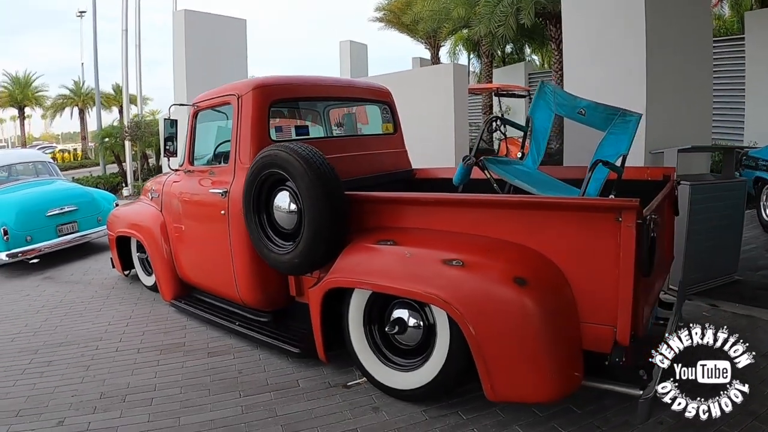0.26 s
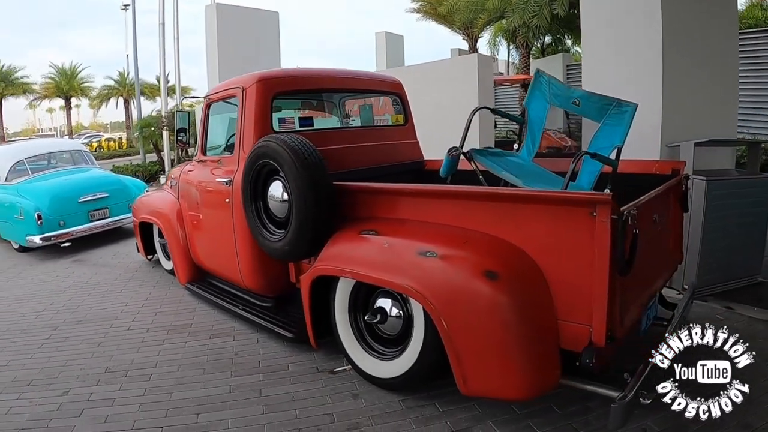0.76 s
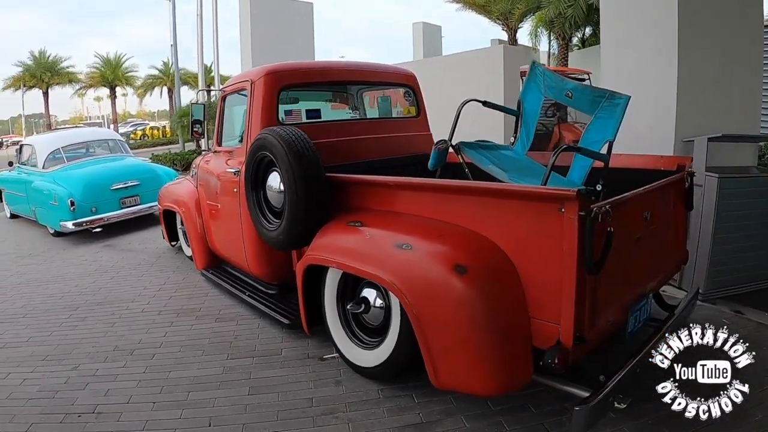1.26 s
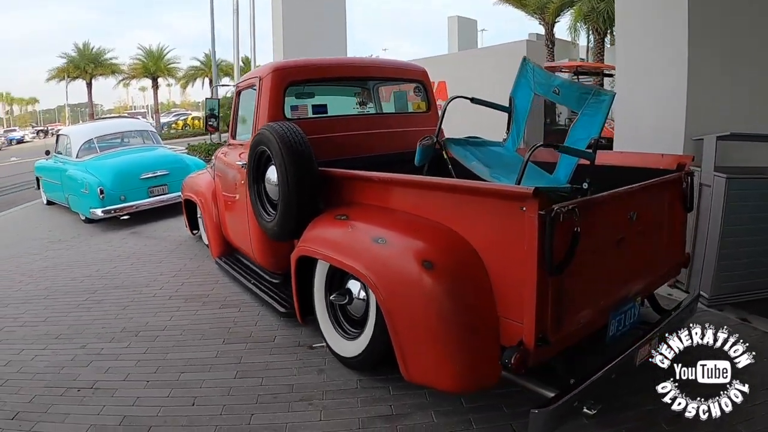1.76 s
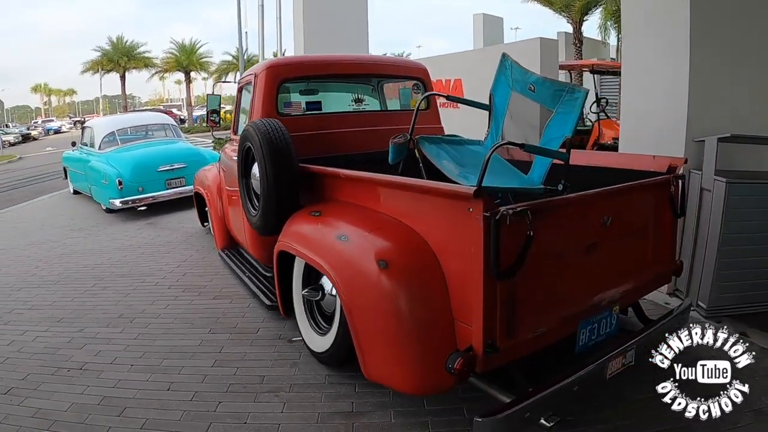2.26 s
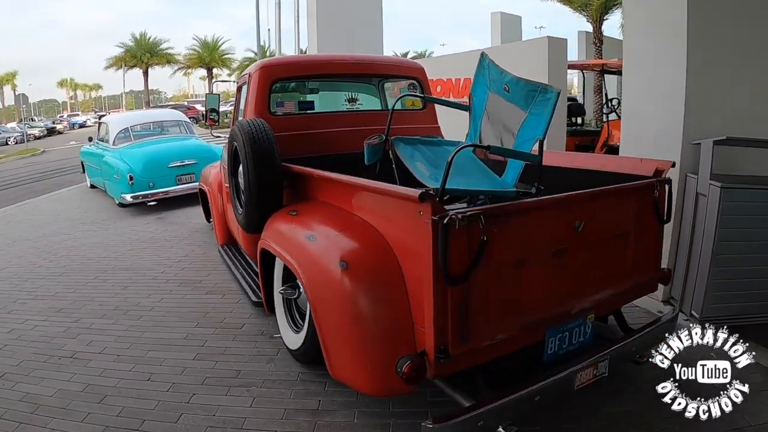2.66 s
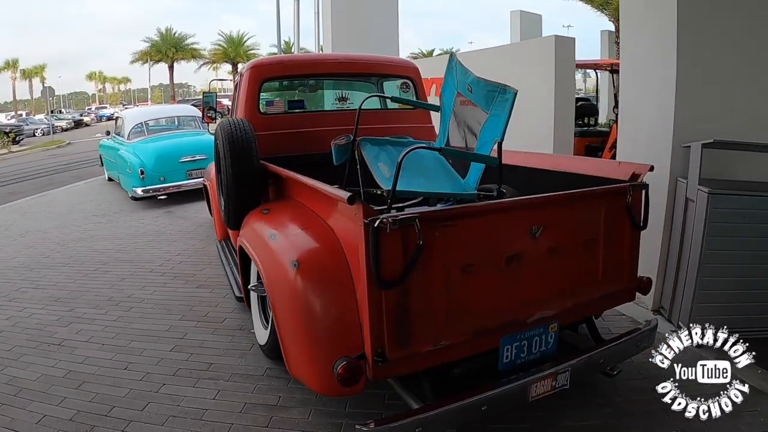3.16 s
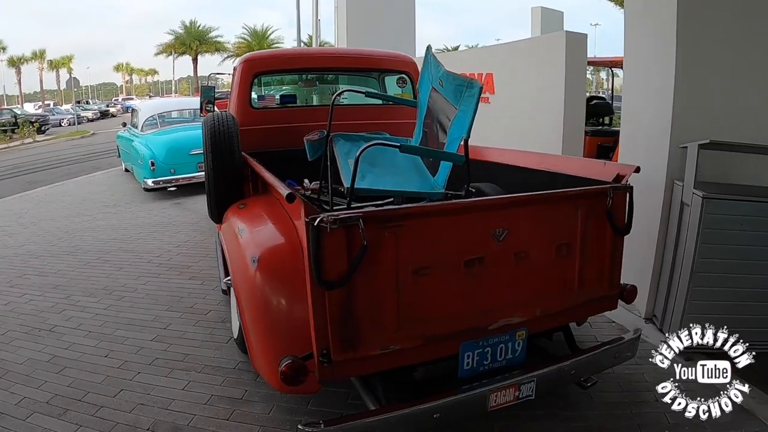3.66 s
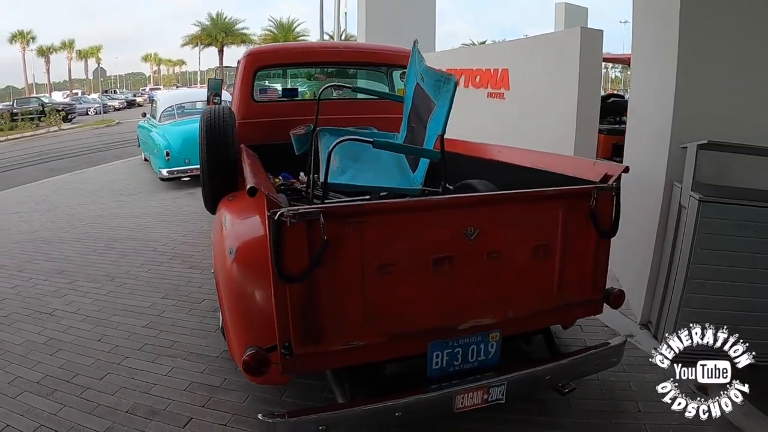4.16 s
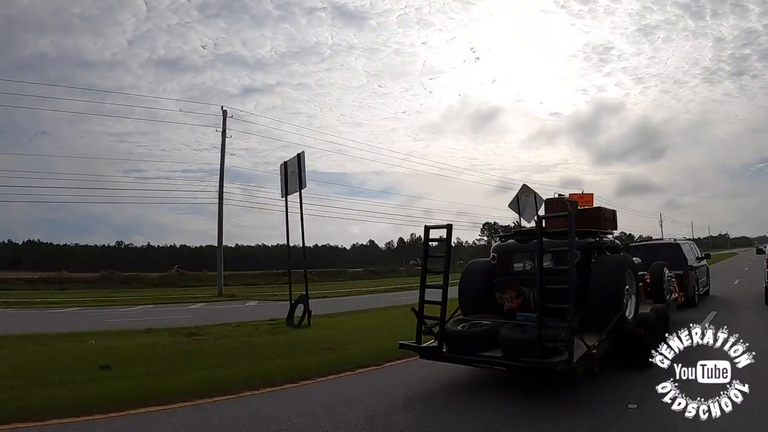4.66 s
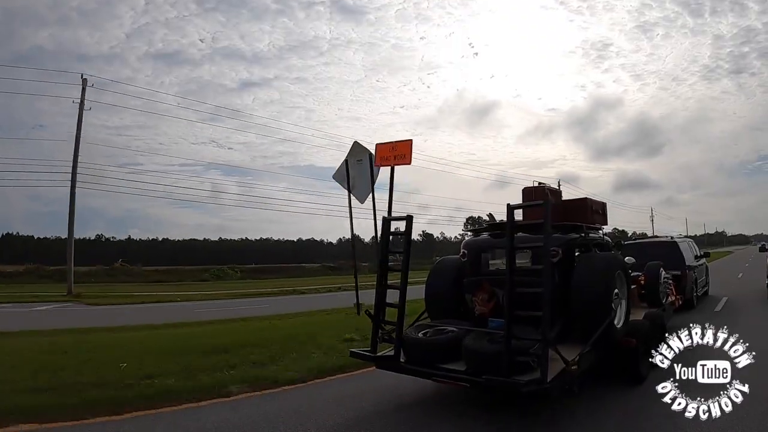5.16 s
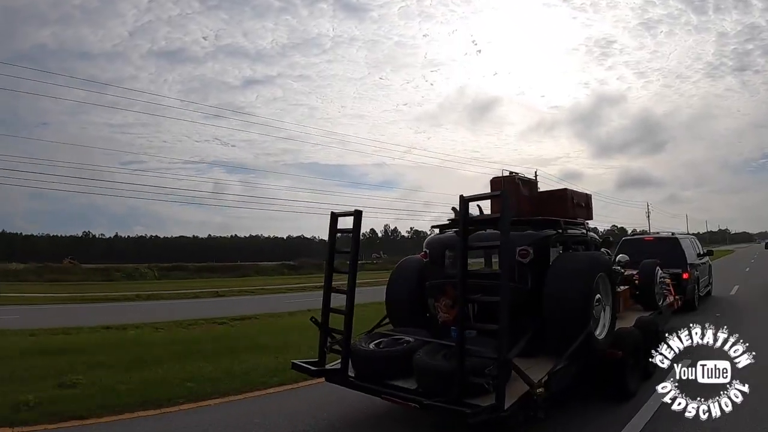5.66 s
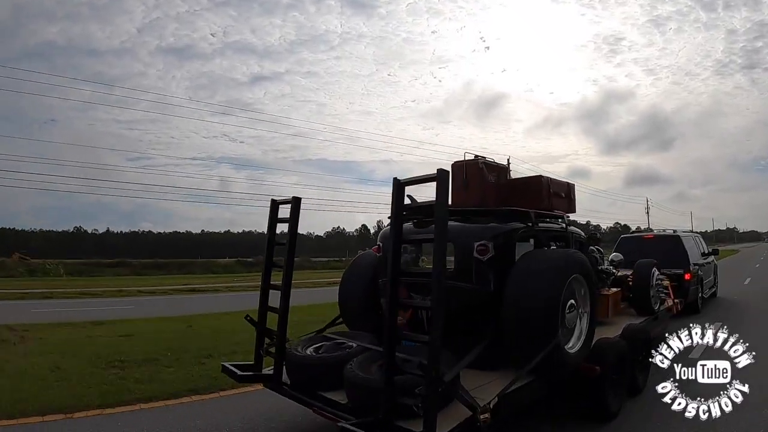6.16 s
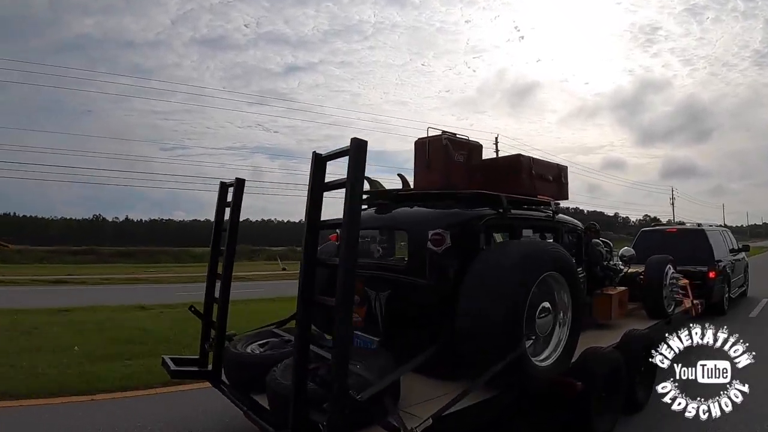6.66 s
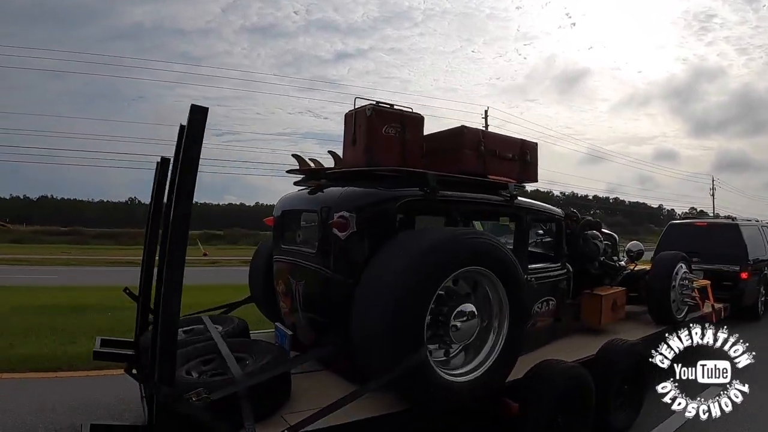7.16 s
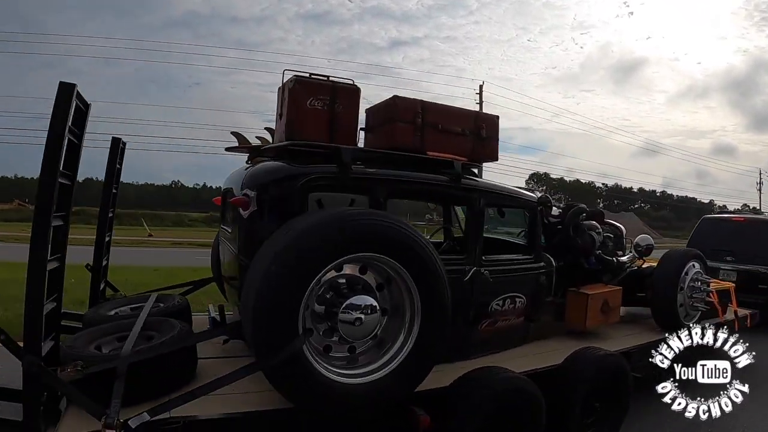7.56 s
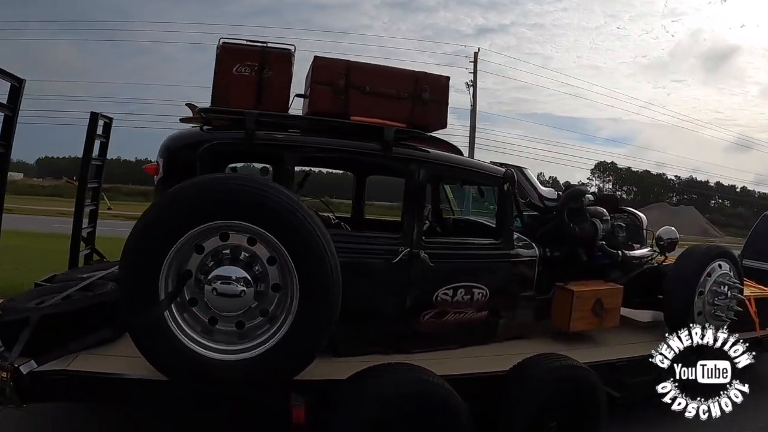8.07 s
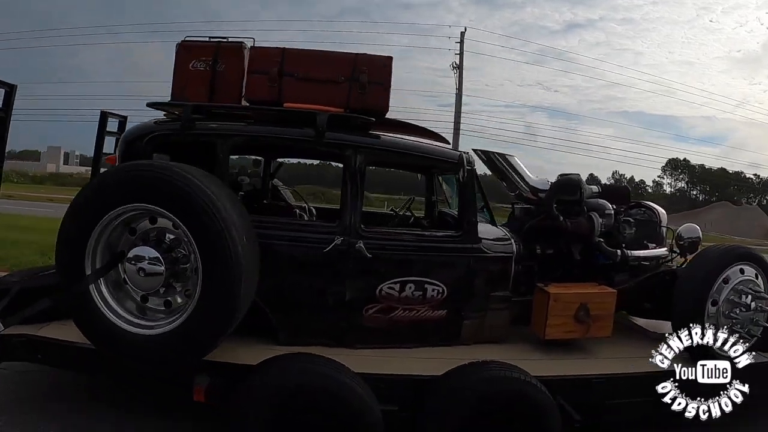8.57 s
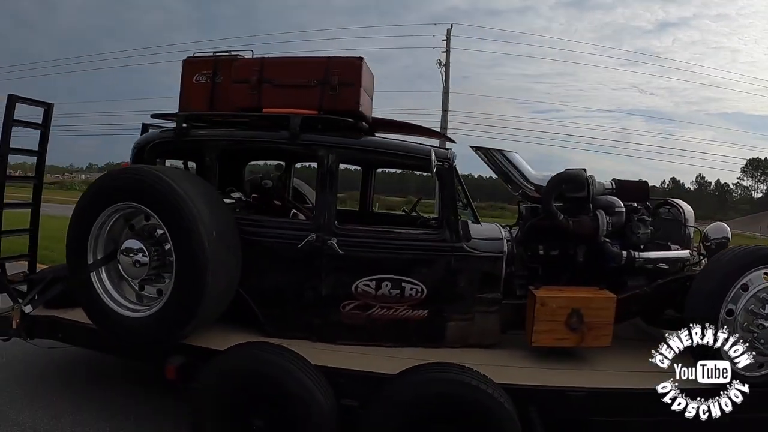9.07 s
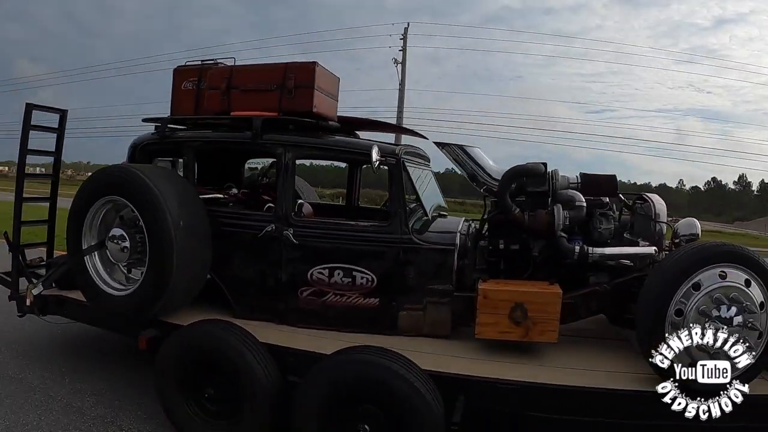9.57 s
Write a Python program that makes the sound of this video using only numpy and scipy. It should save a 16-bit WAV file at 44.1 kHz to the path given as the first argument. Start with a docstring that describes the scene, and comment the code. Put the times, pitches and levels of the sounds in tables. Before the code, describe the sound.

A dull, bumping scrape sounds over the low pulsing exhaust of an idling truck in an echoing covered area. Faint metal clinks follow, then a door thuds shut with a latch rattle. The sound cuts off and a much louder highway ride begins: gusts batter the microphone with deep rumble and crackle, tyres roar, air rushes past, and a nearby trailer's tyres drone toward the end.

```python
"""Gusts buffet a microphone riding at highway speed beside a trailer: turbulent pressure makes it
rumble, slap and rasp over the roar of tyres and the rush of air along the body.
Before the ride, and parted from it by a short silence, a V8 pickup idles under a concrete porch,
its exhaust pulsing at the firing rate. There something scrapes by friction, metal squeaks and
clinks, and a door shuts, ringing in its modes while the concrete reverberates."""
import sys
import numpy as np
from scipy import signal
from scipy.fft import rfft, irfft, next_fast_len
from scipy.io import wavfile

SR = 44100
rng = np.random.default_rng(int(sys.argv[2]) if len(sys.argv) > 2 else 0)


def generate_wav(signal):
    """Clip the signal to [-1, 1] and save it as 16-bit WAV at the path in sys.argv[1]."""
    frames = np.transpose(np.atleast_2d(signal))
    scaled = np.clip(frames, -1, 1) * 32767
    pcm = np.round(scaled).astype(np.int16)
    wavfile.write(sys.argv[1], SR, pcm)


N = 433062
TIME = np.arange(N) / SR


def amp(db):
    """Amplitude ratio of a level in decibels."""
    return 10 ** (np.asarray(db) / 20)


def unit_rms(x):
    """Normalisation to an rms of 1."""
    return x / np.sqrt(np.mean(x ** 2) + 1e-20)


def curve(rows, column=1):
    """Linear interpolation of one table column in time."""
    rows = np.array(rows)
    return np.interp(TIME, rows[:, 0], rows[:, column])


def filtered(x, gain):
    """Zero-phase filtering by a function of frequency; rms 1."""
    size = next_fast_len(len(x), True)
    hz = np.fft.rfftfreq(size, 1 / SR) + 1e-3
    return unit_rms(irfft(rfft(x, size) * gain(hz), size)[:len(x)])


def coloured(x, spectrum):
    """Spectral shaping by points of (f/Hz, relative level/dB); rms 1."""
    hz, db = np.transpose(spectrum)
    return filtered(x, lambda f: amp(np.interp(np.log(f), np.log(hz + 1e-3), db)))


def ringing(x, modes):
    """Parallel resonances of (f/Hz, bandwidth/Hz, relative level/dB); rms 1."""
    return filtered(x, lambda f: sum(amp(db) / (1 + (2 * (f - hz) / width) ** 2)
                                     for hz, width, db in modes))


def white(size=N):
    """Gaussian white noise."""
    return rng.standard_normal(size)


def flutter(low_hz, high_hz, step=8):
    """Band-limited random modulation, drawn on a coarse time grid; rms about 1."""
    def band(f):
        return 1 / np.sqrt((1 + (low_hz * step / f) ** 4) * (1 + (f / step / high_hz) ** 4))
    coarse = TIME[::step]
    return np.interp(TIME, coarse, filtered(white(len(coarse)), band))


def clicks(per_s, spread_db):
    """Poisson impulses of uneven size; rms 1."""
    at = np.flatnonzero(rng.random(N) < per_s / SR)
    out = np.zeros(N)
    out[at] = rng.choice([-1, 1], len(at)) * amp(spread_db * np.minimum(rng.exponential(1, len(at)), 3))
    return unit_rms(out)


def decay(start, t60, rise_s):
    """Envelope of a damped impact: a fast rise, then a fall of 60 dB in t60 seconds."""
    envelope, live = np.zeros(N), slice(int(start * SR), int((start + 1.4 * t60) * SR))
    age = np.maximum(TIME[live] - start, 0)
    envelope[live] = (1 - np.exp(-age / rise_s)) * np.exp(-np.log(1000) * age / t60)
    return envelope


def swell(start, length, rise_s, release_s):
    """Envelope of a sustained excitation: linear rise, hold, exponential release."""
    envelope, live = np.zeros(N), slice(int(start * SR), int((start + length + 8 * release_s) * SR))
    age = TIME[live] - start
    envelope[live] = np.clip(age / rise_s, 0, 1) * np.exp(-np.maximum(age - length, 0) / release_s)
    return envelope


# Spectrum of distant traffic: f/Hz, relative level/dB
TRAFFIC_SPECTRUM = [(20, -50), (38, -19), (60, -19.5), (130, -12), (250, -14.5), (420, -11), (600, -19),
                    (720, -19.5), (860, -21.5), (1000, -25), (2900, -33.5), (4500, -43.5), (7000, -49),
                    (10000, -57), (13000, -68), (16000, -86)]

def traffic(level_db=-40):
    """Incoherent sum: distant vehicles merge into nearly steady noise around the porch."""
    return amp(level_db + 0.5 * flutter(0.71, 5.1)) * coloured(white(), TRAFFIC_SPECTRUM)


# Spectrum of the thin hiss: f/Hz, relative level/dB
HISS_SPECTRUM = [(1760, -37), (3000, -3), (3200, -9), (3760, 2.5), (4650, -0.5), (5360, -3.5), (6540, -1.5),
                 (10900, -16.5), (14000, -36)]

def hiss(level_db=-55.5, start=3.57, rise_s=0.23):
    """Exponential approach to a steady level: a thin hiss swells as the door shuts, and lingers."""
    growth = 1 - np.exp(-np.maximum(TIME - start, 0) / rise_s)
    return amp(level_db) * growth * coloured(white(), HISS_SPECTRUM)


# Faint squeaks of metal: t/s, duration/s, f/Hz, level/dB
SQUEAKS = [(1.965, .06, 6720, -66), (2.425, .045, 6660, -66), (2.49, .09, 6250, -66)]

def squeaks(width_hz=220, rub_band=(7300, 2400, -11)):
    """Frictional excitation: a narrow resonance sounds with a broad band of rubbing hiss."""
    out = np.zeros(N)
    for t, length, hz, db in SQUEAKS:
        envelope = amp(db) * swell(0, length, rise_s=0.025, release_s=0.038)[:SR]
        out[int(t * SR):][:SR] += envelope * ringing(white(SR), [(hz, width_hz, 0), rub_band])
    return out


# Light knocks on metal: t/s, relative level/dB
CLINKS = [(2.488, -54), (2.905, -47)]
# Modes of that metal: f/Hz, bandwidth/Hz, relative level/dB, reverberation T60/s
CLINK_MODES = [(2510, 400, -6, 1.2), (2930, 600, -2.5, 1.1), (3540, 600, -6, 1.4), (4100, 600, -5.5, 1.4),
               (4350, 320, -10.5, 1.6), (5300, 900, -12.5, 1.1), (5990, 400, -13, 1.1),
               (6500, 500, -18, 1.1), (8700, 2000, -19, 1.3)]

def clinks(strike_db=2, echo_db=-1, echo_rise_s=0.018):
    """Direct sound and reverberation: a short metal strike, then the porch's echo builds and lingers."""
    out, age = np.zeros(N), TIME[:SR]
    strike = amp(strike_db) * decay(0, t60=0.13, rise_s=0.002)[:SR]
    for t, db in CLINKS:
        for hz, width, mode_db, t60 in CLINK_MODES:
            echo = amp(echo_db) * (1 - np.exp(-age / echo_rise_s)) * np.exp(-np.log(1000) * age / t60)
            envelope = amp(db + mode_db) * np.hypot(strike, echo)
            out[int(t * SR):][:SR] += envelope * ringing(white(SR), [(hz, width, 0)])
    return out


# Bands of the finest grit: f/Hz, bandwidth/Hz, relative level/dB
SIZZLE_BANDS = [(8800, 1500, 2), (10800, 1100, -5)]

def sizzle(level_db=-58):
    """Shot noise: fine grit slides on at the end of the drag."""
    envelope = amp(level_db) * swell(start=0.5, length=0.17, rise_s=0.06, release_s=0.13)
    return envelope * ringing(clicks(per_s=3000, spread_db=3), SIZZLE_BANDS)


# Small metal parts ticking in the scrape: t/s, f/Hz, level/dB
TICKS = [(.088, 8200, -51), (.100, 9500, -50), (.108, 6200, -42), (.134, 6500, -40), (.323, 4200, -37),
         (.365, 9500, -43), (.613, 9000, -41), (.696, 9300, -48), (.713, 10500, -50)]

def ticks(width_hz=2600):
    """Heavy damping: each small impact is a brief, broad band of noise."""
    out = np.zeros(N)
    envelope = decay(0, t60=0.016, rise_s=0.0003)[:SR]
    for t, hz, db in TICKS:
        out[int(t * SR):][:SR] += amp(db) * envelope * ringing(white(SR), [(hz, width_hz, 0)])
    return out


# Modes of small loose parts: f/Hz, bandwidth/Hz, relative level/dB
JINGLE_MODES = [(2950, 110, 3), (3800, 110, 4), (4480, 130, 1), (5870, 170, 1), (6860, 140, -4),
                (7600, 200, -5), (9260, 200, -9)]

def jingle():
    """Impulse response: random knocks ring each loose part at its own frequency; rms 1."""
    out = np.zeros(N)
    for hz, width, db in JINGLE_MODES:
        resonator = signal.iirpeak(hz, hz / width, fs=SR)
        out += amp(db) * unit_rms(signal.lfilter(*resonator, clicks(per_s=90, spread_db=3)))
    return unit_rms(out)


# Strokes of the scrape and a later scuff: t/s, duration/s, initial body level/dB, grit level/dB
STROKES = [(0.072, 0.14, -28.5, -44), (0.26, 0.19, -32, -44), (0.414, 0.16, -31, -44),
           (0.603, 0.099, -46, -52), (1.204, 0.037, -35.5, -53)]
# Bumps of the dragged object: t/s, level/dB
BUMPS = [(.122, -21), (.165, -26), (.2, -23), (.452, -23.5), (.548, -26)]
# Snags of the grit: t/s, relative level/dB
SNAGS = [(.088, -52), (.107, -47), (.136, -44), (.171, -42), (.245, -36), (.322, -39), (.364, -35),
         (.427, -44), (.473, -46), (.533, -46), (.570, -42), (0.613, -31), (.628, -40), (.696, -40)]
# Spectrum of the object's dull body: f/Hz, relative level/dB
BODY_SPECTRUM = [(120, -8), (280, 0), (440, 3.5), (600, -2.5), (900, -11), (1500, -18.5), (2500, -26),
                 (8000, -69)]
# Spectrum of the grit: f/Hz, relative level/dB
GRIT_SPECTRUM = [(700, -2), (1500, -3), (3000, -2), (4300, -3.5), (5100, -9.5), (6600, -7), (9000, -18),
                 (11000, -24), (13000, -35), (15500, -48)]

def scrape(sag_db_per_s=5.5, snag_db=-1, crackle_db=-5, jingle_db=-8):
    """Sliding friction: a surface drags and catches, exciting a dull body, grit and loose parts."""
    body_power, rub_power = np.zeros(N), np.zeros(N)
    for t, length, body_db, grit_db in STROKES:
        stroke = swell(t, length, rise_s=0.03, release_s=0.24)
        body_power += (stroke * amp(body_db - sag_db_per_s * (TIME - t))) ** 2  # the push eases
        rub_power += (stroke * amp(grit_db)) ** 2
    bumps = sum(amp(db) * decay(t, t60=0.11, rise_s=0.0037) for t, db in BUMPS)
    snags = sum(amp(db + snag_db) * decay(t, t60=0.034, rise_s=0.00083) for t, db in SNAGS)
    body = np.sqrt(body_power + bumps ** 2) * coloured(white(), BODY_SPECTRUM)
    grit = coloured(white() + amp(crackle_db) * clicks(per_s=900, spread_db=3), GRIT_SPECTRUM)
    rub = np.sqrt(rub_power)
    return body + (rub + snags) * grit + amp(jingle_db) * rub * jingle()


# Contacts of the door and its rattling latch: t/s, panel level/dB, latch level/dB
DOOR_CONTACTS = [(3.615, -26, -52), (3.625, -24, -41.5), (3.642, -21, -55), (3.703, -27, -42.5),
                 (3.785, -48, -46), (3.982, -57, -50)]
# Deep modes of the door: f/Hz, level/dB, T60/s
BOOM_MODES = [(205, -24, .2), (231, -33, .45), (335, -19.5, .33), (390, -19, .25), (425, -22, .2),
              (696, -36, .55), (777, -33, .7), (912, -38, .85)]
# Resonances of the panel, latch, first crack and lingering ring: f/Hz, bandwidth/Hz, relative level/dB
PANEL_MODES = [(200, 80, 1), (339, 67, 3), (410, 120, -3.5), (550, 160, -4), (764, 300, 2.5), (886, 51, -4),
               (1780, 1000, -18.5), (2850, 300, -30)]
LATCH_MODES = [(2840, 500, 2), (4230, 1000, 0.5), (5300, 400, -8), (5970, 600, 4), (7200, 1300, -7),
               (9500, 1500, -16.5)]
CRACK_MODES = [(1330, 450, 4.5), (1900, 360, 2)]
RING_MODES = [(2552, 120, -1), (2790, 100, -4), (3020, 130, -3)]

def door(panel_echo_db=-8, latch_echo_db=-12):
    """Modal decay: each contact rings panel and latch, and the concrete's reverberation draws them out."""
    panel_power, latch_power = np.zeros(N), np.zeros(N)
    for t, panel_db, latch_db in DOOR_CONTACTS:
        thud = decay(t, t60=0.12, rise_s=0.0028)
        snap = decay(t, t60=0.075, rise_s=0.001)
        echo = decay(t, t60=1.0, rise_s=0.0096)
        panel_power += amp(panel_db) ** 2 * (thud ** 2 + (amp(panel_echo_db) * echo) ** 2)
        latch_power += amp(latch_db) ** 2 * (snap ** 2 + (amp(latch_echo_db) * echo) ** 2)
    shut = DOOR_CONTACTS[0][0]
    boom = sum(amp(db) * decay(shut, t60, rise_s=0.0028) * np.sin(2 * np.pi * (hz * TIME + rng.random()))
               for hz, db, t60 in BOOM_MODES)
    crack = amp(-30) * decay(shut, t60=0.12, rise_s=0.0015) * ringing(white(), CRACK_MODES)
    ring = amp(-53) * decay(shut, t60=1.1, rise_s=0.01) * ringing(white(), RING_MODES)
    panel = np.sqrt(panel_power) * ringing(white(), PANEL_MODES)
    latch = np.sqrt(latch_power) * ringing(white(), LATCH_MODES)
    return crack + boom + ring + panel + latch


# Course of the idle: t/s, firing rate/Hz, relative level of the tones/dB
IDLE = [(0, 77.4, -36), (.6, 77.4, -34.7), (1.3, 76.6, -33.7), (2.2, 76.1, -34.2), (2.5, 77.3, -34.2),
        (3.3, 77.3, -34.7), (4.34, 77.3, -34)]
# Exhaust harmonics beside and behind the truck: order of the eight-cylinder cycle, relative level/dB
EXHAUST_SIDE = [(4, -27), (5, -26), (6, -23), (7, -35), (8, 0), (9, -10), (10, -36), (11, -5.5), (12, -5),
                (13, -6.5), (14, -1.5), (15, -4.5), (16, -17), (17, -39), (18, -23), (19, -22.5), (20, -12),
                (21, -14), (22, -23), (23, -14.5), (24, -31), (29, -13)]
EXHAUST_REAR = [(4, -23), (5, -25), (6, -19), (7, -12), (8, 2), (9, -8), (10, -11), (11, -5.5), (12, -28),
                (13, -11), (14, -5), (15, -8.5), (16, -20), (17, -9), (18, -15), (19, -7.5), (20, -28),
                (21, -15), (22, -27), (23, -16), (24, -5), (29, -14.5)]
# Path of the listener: t/s, position (0 beside the truck, 1 behind it)
LISTENER_PATH = [(2.1, 0.045), (2.5, 1), (3.2, 0.51), (3.9, 1)]
# Each cylinder's puff, in firing order: relative level/dB
CYLINDER_LEVELS = [2.5, -5, -8, 1.5, 4, 1, 0.5, -2]
# Spectrum of the escaping gas: f/Hz, relative level/dB
PUFF_SPECTRUM = [(90, -38), (170, -4), (270, -1), (360, -6), (420, -4.5), (560, -14), (1500, -25),
                 (3600, -41), (9000, -54), (14000, -91)]

def engine(tones_db=4, puffs_db=-39.5, hunting=0.003, wobble=0.14, puff_firings=0.45, steady_flow=0.93):
    """Periodic exhaust flow: low harmonics and a puff for each firing; unequal cylinders make it lope."""
    firings = np.cumsum(curve(IDLE) * (1 + hunting * flutter(2, 4.9))) / SR
    cycles = firings / len(CYLINDER_LEVELS)
    behind, tones = curve(LISTENER_PATH), np.zeros(N)
    for (order, side_db), (_, rear_db) in zip(EXHAUST_SIDE, EXHAUST_REAR):
        height = (1 - behind) * amp(side_db) + behind * amp(rear_db)
        per_cycle = 1 + wobble * white(60)  # no two cycles burn alike
        unsteady = np.interp(cycles, np.arange(len(per_cycle)), per_cycle)
        tones += height * unsteady * np.cos(2 * np.pi * (order * cycles + rng.random()))
    count = firings.astype(int)
    strength = amp(np.take(CYLINDER_LEVELS, count, mode="wrap") + white(2000)[count])  # 1 dB of scatter
    gas_flow = steady_flow + strength * np.exp(-(firings % 1) / puff_firings)
    puffs = coloured(white() * gas_flow, PUFF_SPECTRUM)
    tone_gain = amp(curve(IDLE, column=2) + tones_db + 0.6 * flutter(3.4, 5.6))
    return tone_gain * unit_rms(tones) + amp(puffs_db) * puffs


def lee(outside=0, inside=1, start=6.58, crossing_s=0.26):
    """Wind shadow: a value moves from that of the open airstream to that of the trailer's lee."""
    return outside + (inside - outside) * np.clip((TIME - start) / crossing_s, 0, 1)


# Lulls in the airflow: t/s, duration/s, depth/dB
LULLS = [(4.675, .025, 3), (4.843, 0.018, 2.5), (5.075, .055, 3), (5.536, 0.13, 2), (5.682, .02, 7),
         (5.798, 0.02, 2), (5.945, .025, 1), (6.345, .04, 0), (6.536, 0.024, 0), (6.71, 0.028, 5),
         (6.79, .035, 1.5), (6.914, 0.093, 5.5), (7.156, .035, 3), (7.633, 0.049, 4.5), (7.876, 0.047, 5.5),
         (8.106, 0.051, 6), (8.929, .02, 7), (9.295, 0.028, 5), (9.44, 0.034, 4.5)]

def lull_gain():
    """Intermittency of the flow: a gain of 1 that dips in each lull."""
    return amp(-sum(db * swell(t, length, rise_s=0.021, release_s=0.0064) for t, length, db in LULLS))


# Gusts on the microphone: t/s, duration/s, relative level/dB
GUSTS = [(4.528, 0.082, -16), (4.635, 0.045, -15), (4.698, 0.16, -16.5), (4.874, 0.046, -14.5),
         (4.945, 0.048, -14.5), (5.008, 0.15, -17.5), (5.152, 0.06, -13.5), (5.229, 0.24, -16.5),
         (5.467, 0.056, -14), (5.639, 0.081, -16), (5.719, 0.035, -17), (5.829, 0.039, -16),
         (5.904, 0.018, -16), (5.988, .14, -15.5), (6.174, 0.076, -12), (6.28, 0.041, -12.5),
         (6.386, 0.15, -15), (6.569, 0.094, -14), (6.675, 0.03, -11), (6.75, 0.025, -17),
         (6.827, 0.056, -14.5), (6.984, 0.1, -12), (7.096, 0.065, -19.5), (7.196, 0.022, -12.5),
         (7.295, 0.019, -17.5), (7.476, 0.19, -15.5), (7.707, 0.11, -20.5), (7.803, 0.057, -18),
         (7.97, 0.048, -18), (8.04, 0.038, -15.5), (8.207, 0.075, -19), (8.33, 0.15, -18.5),
         (8.51, 0.31, -17.5), (8.961, 0.07, -19.5), (9.054, 0.13, -21), (9.19, 0.089, -15.5),
         (9.345, 0.058, -19), (9.538, 0.26, -16.5)]
OPEN_FLOW_DB, LEE_FLOW_DB = -19.5, -26.5  # steady flow between the gusts

def air_force():
    """Addition of powers: gusts and steady flow give the envelope of the force on the microphone."""
    steady = amp(lee(OPEN_FLOW_DB, LEE_FLOW_DB))
    gust_power = sum((amp(db) * swell(t, length, rise_s=0.014, release_s=0.0096)) ** 2
                     for t, length, db in GUSTS)
    return lull_gain() * np.sqrt(steady ** 2 + gust_power)


# Air rushing along the body: t/s, relative level/dB
RUSH_LEVELS = [(4.56, -55), (4.85, -40.5), (5.1, -55), (5.25, -41.5), (5.5, -39.5), (5.65, -41.5),
               (5.95, -37.5), (6.5, -41), (6.95, -40.5), (7.15, -41), (7.3, -39.5), (7.46, -37),
               (7.58, -54), (7.9, -48.5), (8.7, -44.5), (9.82, -44)]
# Spectrum of that rush: f/Hz, relative level/dB
RUSH_SPECTRUM = [(800, -34.5), (2200, 0.5), (3500, -3.5), (5000, -9.5), (8000, -23), (10000, -36),
                 (14000, -61), (17000, -83)]

def air_rush(force, gain_db=-2, flicker_db=2, gust_share=0.13):
    """Flow noise: air flutters along the body, softer in lulls and, outside the lee, harder in gusts."""
    gusting = 1 + lee(gust_share, 0) * (force / amp(OPEN_FLOW_DB) - 2)
    level_db = curve(RUSH_LEVELS) + gain_db + flicker_db * flutter(14, 170)
    return lull_gain() * gusting * amp(level_db) * coloured(white(), RUSH_SPECTRUM)


# Drone of the trailer as it draws alongside: t/s, level/dB
DRONE_LEVELS = [(4.5, -42), (6.5, -42.5), (7.8, -26.5), (8.8, -23.5), (9.82, -28)]
# Resonances of its tyres: f/Hz, bandwidth/Hz, relative level/dB
DRONE_MODES = [(214, 53, 2.5), (294, 55, -5), (800, 370, -10)]

def trailer(sway_db=1.5):
    """Resonance: tread noise drones in a few broad bands, swaying with the turbulence."""
    level_db = curve(DRONE_LEVELS) + sway_db * flutter(3.6, 23)
    return lull_gain() * amp(level_db) * ringing(white(), DRONE_MODES)


# Spectrum of tyres on the road: f/Hz, relative level/dB
TYRE_SPECTRUM = [(25, -45), (60, -14.5), (110, 2), (200, -2.5), (300, -10), (430, -6.5), (650, -11.5),
                 (850, -12), (1150, -12), (2000, -20), (3000, -26.5), (5000, -36), (8000, -55),
                 (15000, -86.5)]

def tyres(open_db=-27.5, lee_db=-26, sway_db=1, lull_share=0.2):
    """Rolling noise: a steady broadband roar, a little louder beside the trailer."""
    level_db = lee(open_db, lee_db) + sway_db * flutter(1, 8)
    return lull_gain() ** lull_share * amp(level_db) * coloured(white(), TYRE_SPECTRUM)


# Spectrum of the largest eddies: f/Hz, relative level/dB
RUMBLE_SPECTRUM = [(15, -25), (45, -10), (75, 0), (130, -15), (300, -40.5), (2000, -100)]

def rumble(force, open_db=-18, lee_db=-17, roll_db=1, wake_db=-35, wake_start=7.4, wake_rise_s=0.5):
    """Large-scale turbulence: deep eddies follow the gusts; the trailer's wheels add a steady wake."""
    gusts = force * amp(lee(open_db, lee_db))
    wake = amp(wake_db) * np.clip((TIME - wake_start) / wake_rise_s, 0, 1)
    return np.hypot(gusts, wake) * amp(roll_db * flutter(0.79, 5)) * coloured(white(), RUMBLE_SPECTRUM)


# Loudest spits of air: t/s, duration/s, relative level/dB
SPITS = [(4.605, 0.011, -31), (4.8, .03, -34), (4.894, .012, -32), (4.987, .01, -35), (5.027, 0.016, -32),
         (5.158, 0.033, -36), (5.483, 0.034, -32), (5.782, .01, -36), (5.852, .012, -33), (5.873, .01, -34),
         (5.965, .01, -32), (6.021, .01, -33), (6.186, .012, -32.5), (6.291, .012, -28), (6.402, .025, -37),
         (6.493, .012, -34), (6.615, .008, -31), (6.634, 0.012, -29.5), (6.69, .012, -36),
         (6.849, 0.013, -31), (7.053, 0.011, -28.5), (7.608, 0.006, -28)]
# Spectrum of a spit: f/Hz, relative level/dB
SPIT_SPECTRUM = [(300, -27), (900, 5.5), (2000, 7.5), (4500, -5), (7000, -19.5), (10000, -37), (16000, -80)]

def spits(force, open_db=-22, lee_db=-28, loud_db=-1, per_s=22, width_s=0.0024):
    """Flow separation at the microphone's rim: loud crackles, and small random ones scaled by the force."""
    tears = (rng.random(N) < per_s / SR) * rng.uniform(0.38, 1, N)
    pulse = signal.windows.gaussian(SR // 10, width_s * SR / 2)
    small_power = abs(signal.oaconvolve(tears, pulse, "same")) * (amp(lee(open_db, lee_db)) * force) ** 2
    loud_power = sum((amp(db + loud_db) * swell(t, length, rise_s=0.002, release_s=0.006)) ** 2
                     for t, length, db in SPITS)
    crackle = coloured(clicks(per_s=2400, spread_db=0.5), SPIT_SPECTRUM)
    return np.sqrt(small_power + loud_power) * crackle


# Spectrum of the buffeting: f/Hz, relative level/dB
BUFFET_SPECTRUM = [(15, -38), (25, -25.5), (60, -5), (110, 0.5), (200, 0.5), (320, -2), (600, -11),
                   (1000, -17), (2000, -27), (4200, -46), (6500, -56.5), (9000, -76), (12000, -94),
                   (16000, -120)]
# Hardest slaps of air: t/s, relative level/dB
SLAPS = [(4.61, 2.5), (4.715, 4), (5.066, 3), (5.574, 3), (5.65, 1), (5.784, 4.5), (6.234, -1.5), (6.29, 8),
         (6.426, 5.5), (6.52, 3.5), (6.621, 7), (6.696, 8.5), (6.839, 2.5), (7.06, 4), (7.568, 8),
         (7.61, 10.5), (7.77, 5), (7.992, 2), (8.506, 8), (9.083, 4.5), (9.619, 6), (9.709, 4)]

def wind(force, gust_db=-0.1, slap_db=-9, slap_rasp_db=2, rasp_hz=700, deep_hz=130, lee_depth=0.88):
    """Turbulent pressure: eddies shake the microphone and tear into a rasp; the lee thins the deepest."""
    pressure = coloured(white(), BUFFET_SPECTRUM)
    low = signal.sosfiltfilt(signal.butter(2, rasp_hz, fs=SR, output="sos"), pressure)
    deep = signal.sosfiltfilt(signal.butter(2, deep_hz, fs=SR, output="sos"), pressure)
    eddy_db = 5 * np.tanh(flutter(24, 84) / 2)
    gusts = amp(gust_db) * force * unit_rms(amp(eddy_db))
    tearing = unit_rms(amp(3 * flutter(30, 320)))
    rasp = amp(lee(-3, -4)) * tearing * (pressure - low)
    slaps = sum(amp(db + slap_db) * decay(t - 0.001, t60=0.037, rise_s=0.0011) for t, db in SLAPS)
    depth = lee(1, lee_depth) * unit_rms(amp(2 * flutter(2, 15)))  # large eddies come and go
    buffet = low - deep + depth * deep
    return np.hypot(gusts, slaps) * buffet + np.hypot(gusts, amp(slap_rasp_db) * slaps) * rasp


def scene(porch_end=4.345, cut_s=0.0016, ride_start=4.493, fade_s=0.089):
    """Superposition in two scenes: the porch stops dead, then the highway fades in."""
    porch = engine() + traffic() + scrape() + ticks() + sizzle() + clinks() + squeaks() + door() + hiss()
    force = air_force()
    ride = wind(force) + spits(force) + rumble(force) + tyres() + air_rush(force) + trailer()
    porch_on = np.clip(np.minimum(TIME, porch_end - TIME) / cut_s, 0, 1)
    ride_on = np.clip((TIME - ride_start) / fade_s, 0, 1) ** 1.4
    return (porch * porch_on + ride * ride_on)[None]


def record(dry, ceiling=0.69, cutoff_hz=15300):
    """Soft saturation rounds the largest gusts; a low-pass filter then limits the band."""
    rounded = ceiling * np.tanh(dry / ceiling)
    low_pass = signal.firwin(511, cutoff_hz, window=("kaiser", 9), fs=SR)
    return signal.oaconvolve(rounded, low_pass[None], "same")


dry = scene()
out = record(dry)
generate_wav(out)
```